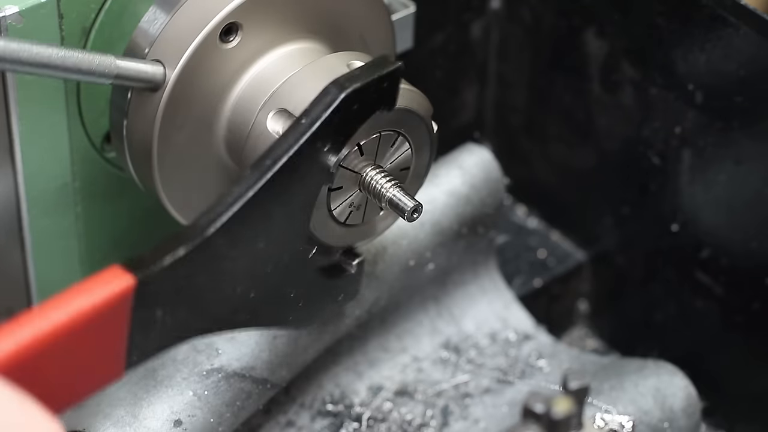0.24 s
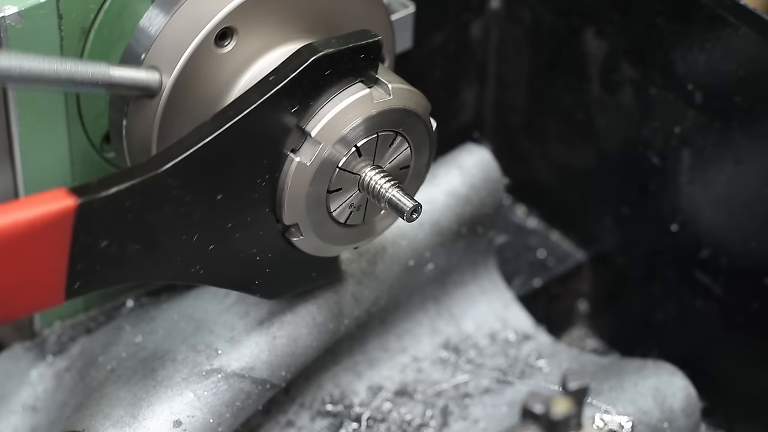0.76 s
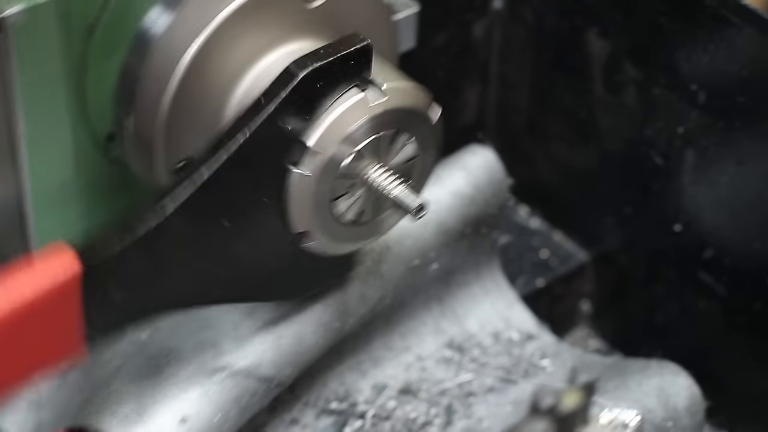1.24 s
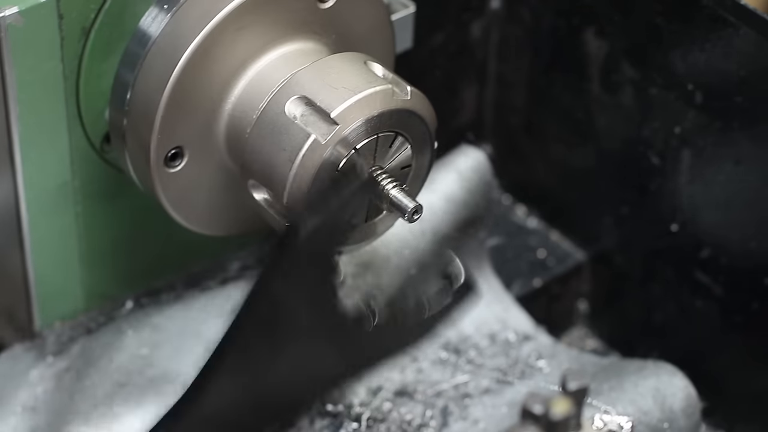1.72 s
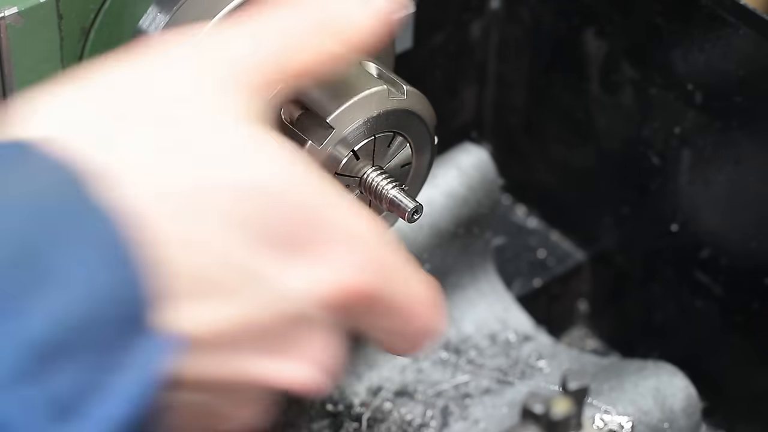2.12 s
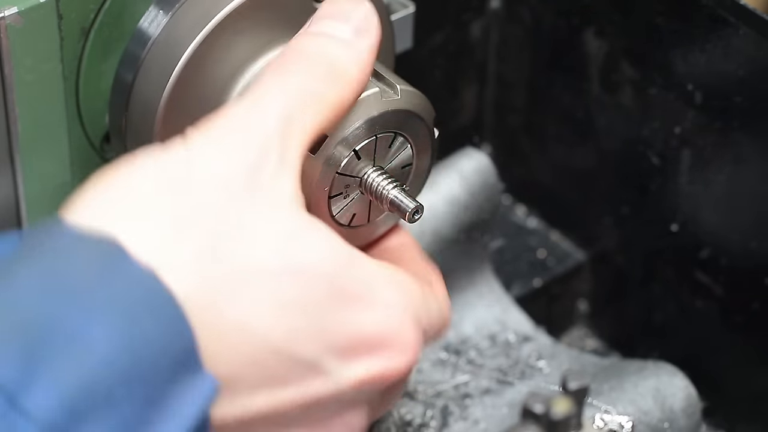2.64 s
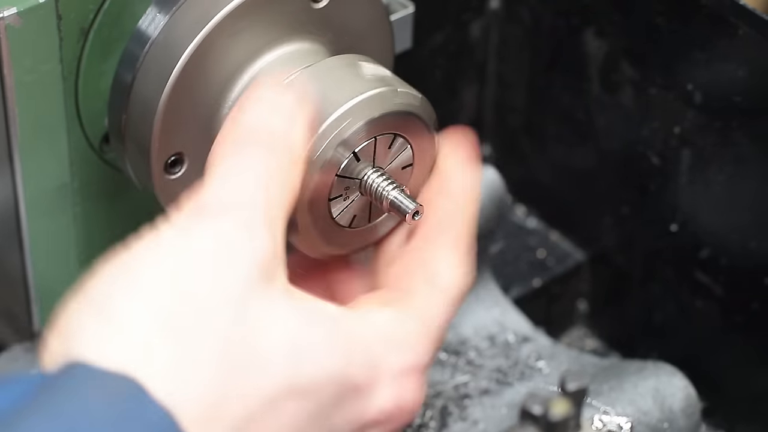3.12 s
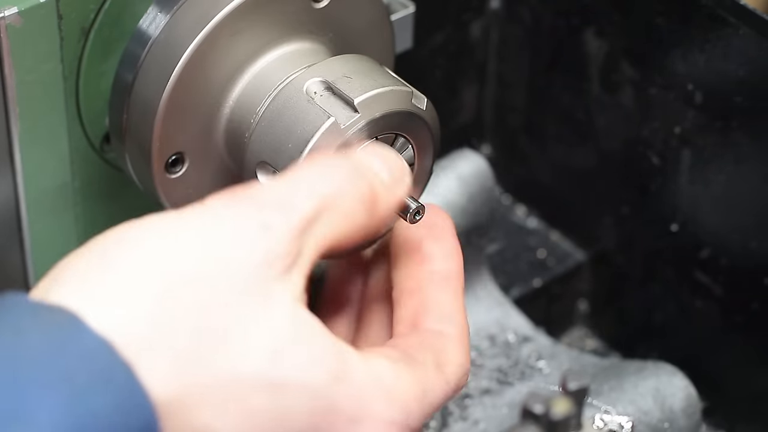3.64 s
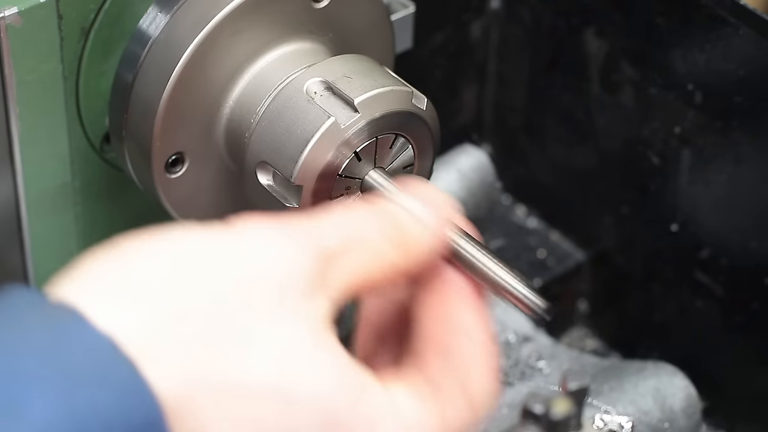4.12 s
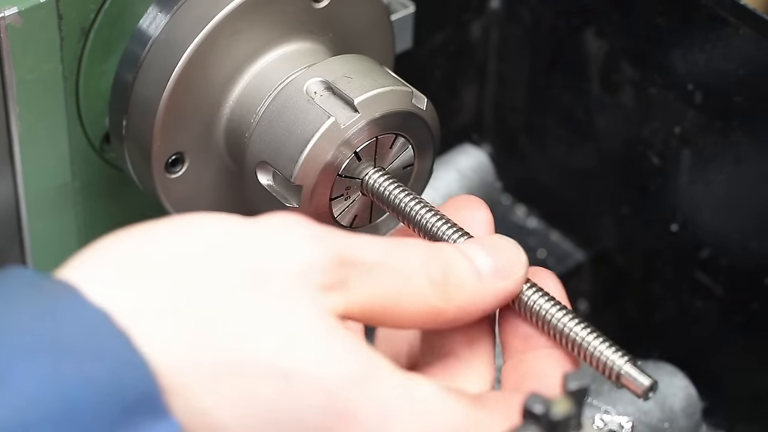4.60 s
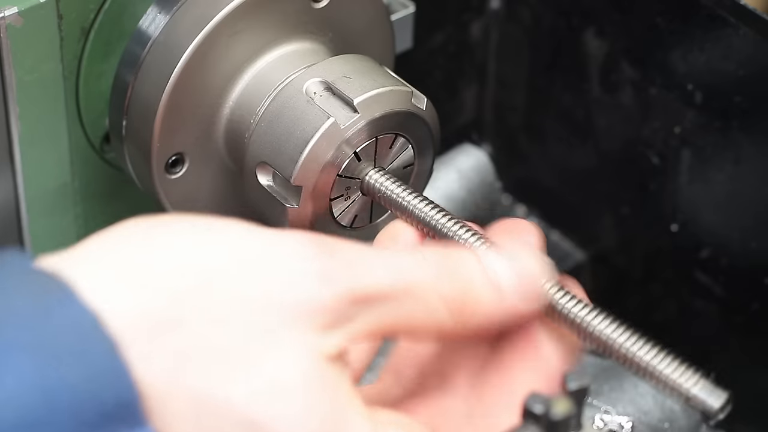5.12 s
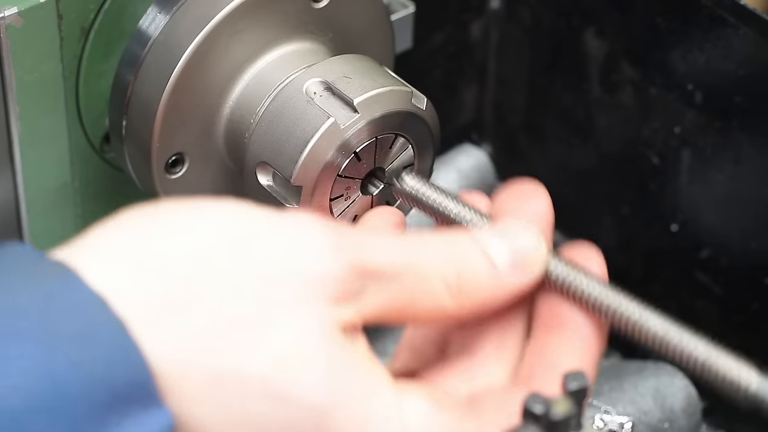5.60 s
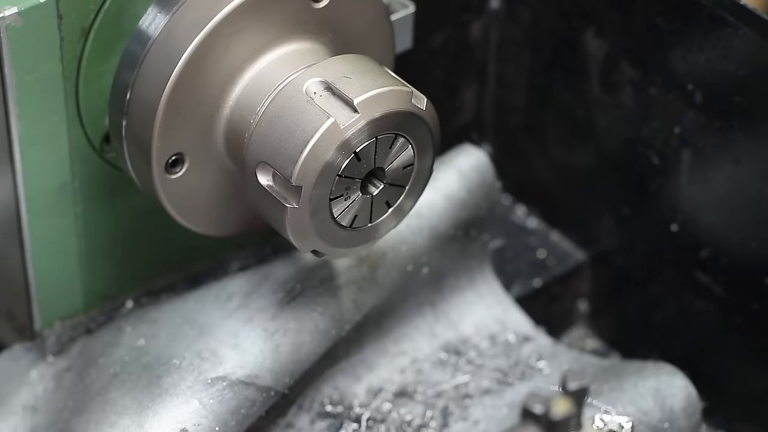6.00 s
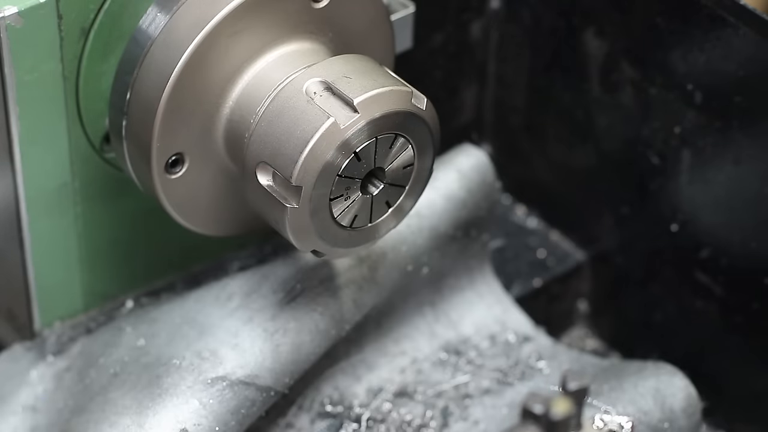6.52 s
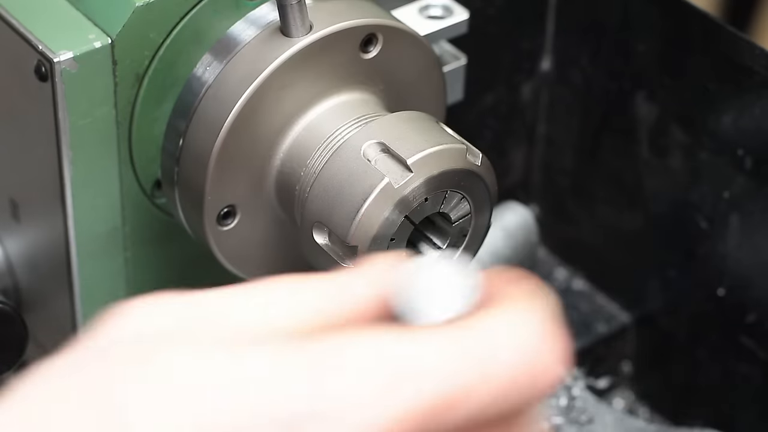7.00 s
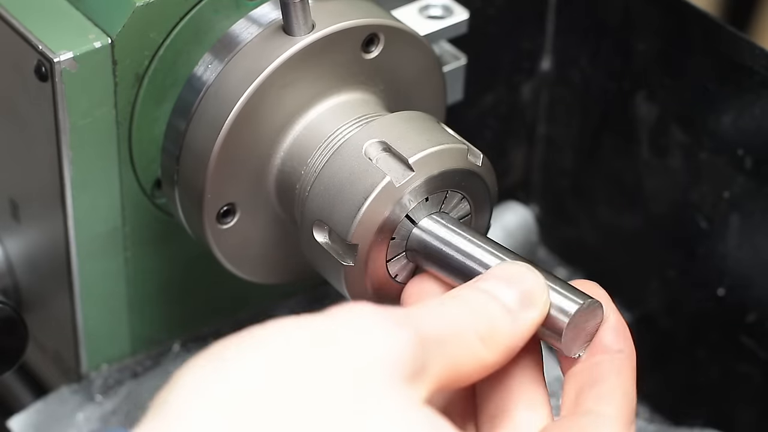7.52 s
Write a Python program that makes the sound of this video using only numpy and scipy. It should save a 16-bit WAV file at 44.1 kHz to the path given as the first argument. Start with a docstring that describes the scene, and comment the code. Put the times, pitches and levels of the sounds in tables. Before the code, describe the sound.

Sharp ringing wrench knocks on a lathe chuck, followed by quieter scraping and ticking as a steel rod is pulled out and another inserted.

```python
"""A hook wrench knocks on the steel nut of a collet chuck and grinds it loose; each blow rings wrench,
nut, spindle head and lathe bed. Fingers unscrew the nut, a threaded rod rasps out through the collet
in jerks and a plain bar slides in. Contacts ring damped steel modes; friction drives them with noise.
Late on, a sleeve rustles over the faint workshop hum."""
import sys
import numpy as np
from scipy import signal
from scipy.fft import rfft, irfft, next_fast_len
from scipy.io import wavfile
from scipy.ndimage import map_coordinates

SR = 44100
rng = np.random.default_rng(int(sys.argv[2]) if len(sys.argv) > 2 else 0)


def generate_wav(signal):
    """Clip the signal to [-1, 1] and save it as 16-bit WAV at the path in sys.argv[1]."""
    frames = np.transpose(np.atleast_2d(signal))
    scaled = np.clip(frames, -1, 1) * 32767
    pcm = np.round(scaled).astype(np.int16)
    wavfile.write(sys.argv[1], SR, pcm)


N = 341807


def amp(db):
    return 10 ** (np.asarray(db) / 20)


def unit_rms(x):
    return x / np.sqrt(np.mean(x ** 2) + 1e-20)


def log_interp(points, hz):
    """Interpolate (Hz, value) points on a log frequency axis."""
    knots_hz, values = np.transpose(points)
    return np.interp(np.log(hz + 1), np.log(knots_hz + 1), values)


def wobble(rate_hz):
    """Smooth random curve, rate_hz knots a second."""
    knots = rng.standard_normal(int(N * rate_hz / SR) + 4)
    return map_coordinates(knots, [np.arange(N) * rate_hz / SR])


def filtered(x, response):
    """Apply a gain given as a function of Hz."""
    size = next_fast_len(len(x) + 8192)
    return irfft(rfft(x, size) * response(np.fft.rfftfreq(size, 1 / SR)), size)[:len(x)]


def lowpass(x, edge_hz):
    return filtered(x, lambda hz: 1 / (1 + (hz / edge_hz) ** 6))


def noise(spectrum, grain_db=0, count=N):
    """Unit-rms noise shaped by (Hz, dB) points; grain_db makes single grains stand out."""
    grains = rng.standard_normal(count) * amp(grain_db * rng.standard_normal(count))
    return unit_rms(filtered(grains, lambda hz: amp(log_interp(spectrum, hz))))


def strokes_db(rows, attack_db_s, release_db_s):
    """Level of each stroke: rise, ramp from start to end level, fall."""
    start_s, length_s, start_db, end_db = np.transpose(rows)[:4, :, None]
    t = np.arange(N) / SR - start_s
    held_db = start_db + (end_db - start_db) * np.clip(t / length_s, 0, 1)
    return held_db - attack_db_s * np.clip(-t, 0, None) - release_db_s * np.clip(t - length_s, 0, None)


def envelope(rows, attack_db_s, release_db_s, offset=False):
    """Summed gain of the strokes; offset adds each row's fifth column in dB."""
    offset_db = np.array(rows)[:, 4:] if offset else 0
    return amp(strokes_db(rows, attack_db_s, release_db_s) + offset_db).sum(axis=0)


def ring(modes, scatter_db, t60_scale, contact_s):
    """Damped modes of unit energy, struck by a contact that rattles briefly."""
    t = np.arange(SR // 2) / SR
    hz, db, t60_s = np.transpose(modes)[..., None]
    db = db + scatter_db * rng.standard_normal(db.shape)
    hz = hz * (1 + .002 * rng.standard_normal(db.shape))  # slightly different random pitch each hit
    rise = 1 - np.exp(-t * hz / 2)
    sound = np.sum(amp(db - 60 * t / (t60_s * t60_scale)) * rise * np.sin(2 * np.pi * hz * t), axis=0)
    if contact_s:
        rattle = rng.standard_normal(len(t)) * amp(-60 * t / contact_s)
        sound = signal.fftconvolve(sound, rattle)[:len(t)]
    return sound / np.linalg.norm(sound)


def rubbed(gain, modes, shift_db, rate_hz, t60_scale=1):
    """Friction noise drives each mode with a strength that shifts as the contact moves."""
    force = gain * rng.standard_normal(N)
    out, energy = np.zeros(N), 0
    for hz, db, t60_s in modes:
        pole, step_rad = amp(-60 / (t60_scale * t60_s * SR)), 2 * np.pi * hz / SR
        drive = amp(db + shift_db * wobble(rate_hz)) * force
        out += signal.lfilter([np.sin(step_rad)], [1, -2 * pole * np.cos(step_rad), pole ** 2], drive)
        energy += amp(2 * db) / 2 / (1 - pole ** 2)
    return out / np.sqrt(energy)


# Still workshop air. Each row: frequency in Hz, relative level in dB.
AIR_SPECTRUM = [(26, -30.5), (45, -6.5), (70, -6.5), (111, -3), (157, -20), (190, -13), (249, -22.5),
                (311, -23.5), (786, -30), (1520, -28.5), (3410, -36), (6930, -38), (15500, -43)]

def room_tone():
    """Steady air noise and a wavering hum near 99 Hz."""
    hum_db = -63.5 + 3.5 * wobble(11)
    hum_hz = 99 + 3 * wobble(5.7)
    return amp(hum_db) * np.sin(2 * np.pi * np.cumsum(hum_hz) / SR) + amp(-63.5) * noise(AIR_SPECTRUM)


# Soft noise swells. Each row: start and length in seconds, start and end level in dB.
SOFT_SWELLS = [(0, 0.011, -42, -54.5), (.29, 0.025, -67, -53.5), (1.27, 0.087, -53, -49.5),
               (4.27, 0.11, -52, -73), (5.87, 0.21, -64, -58), (6.72, 0.2, -70.5, -62)]
# Their spectrum. Each row: frequency in Hz, relative level in dB.
SWELL_SPECTRUM = [(150, -35.5), (250, -2.5), (478, -4.5), (1130, -5.5), (1280, -9.5), (2340, -3),
                  (5510, -19), (12000, -37.5), (15600, -65.5), (22000, -120)]

def soft_swells():
    """Grainy noise swells from a faint floor: tails of the wrench blows early, sleeve rustle later."""
    gain = envelope(SOFT_SWELLS, attack_db_s=390, release_db_s=47) + amp(-74.5)
    return gain * amp(-1.5 + 1.7 * wobble(33)) * noise(SWELL_SPECTRUM, grain_db=2.8)


# Steel contact noise. Each row: frequency in Hz, relative level in dB.
CONTACT_SPECTRUM = [(88, -41), (150, -10.5), (412, -3), (1290, -6.5), (2550, 0.5), (3690, -9), (4310, -5.5),
                    (6120, -9), (6740, -22.5), (8180, -21.5), (15500, -39.5)]

def contact_burst(low_t60_s, high_t60_s, treble_db, rise_s):
    """Broadband part of a contact; the treble dies first."""
    t = np.arange(SR // 2) / SR
    low = lowpass(noise(CONTACT_SPECTRUM, count=len(t)), 5500)
    high = noise([(3500, -37.5), (6500, 2), (9000, -2), (12500, -9), (15000, -8)], count=len(t))
    rise = 1 - np.exp(-t / rise_s)
    return rise * (low * amp(-60 * t / low_t60_s) + high * amp(treble_db - 60 * t / high_t60_s))


# Wrench blows. Each row: start in seconds, level in dB, trims in dB for wrench ring, spindle head,
# treble and nut, decay scale.
WRENCH_BLOWS = [(0.0014, -37, -20.5, 3.5, -31.5, -1, .6), (0.0806, -4.5, -8.5, -34.5, -7.5, -24, .4),
                (0.0863, -2, 2, -38, -9, -25, 0.6), (0.0974, -2, -2.5, -31, -28, -21.5, .62),
                (0.2381, -17, 3, -37, -16.5, -25, .6), (0.2489, -7, -1.5, -40.5, -26.5, -24, 0.62),
                (0.2575, -6.5, -9.5, -21, -13, -21.5, 0.45), (0.287, -11, -10.5, -10, -24, -5.5, 0.34),
                (0.323, -20, -13.5, -12.5, -28.5, -8, 0.76), (0.373, -21, -8.5, -10.5, -24, -7.5, 0.82),
                (0.388, -23.5, -6, -27, -20, -10.5, .4), (0.3934, -11, -4.5, -18, -24.5, 1, 0.33),
                (0.397, -2.5, -12, -14.5, -37, -7, 0.4), (0.476, -25, -6.5, -23.5, -18.5, -2.5, 0.44),
                (0.4795, -3, -11.5, -24, -23.5, -10, 0.5), (0.6495, -47, -19, -28, -5.5, -17.5, .6),
                (0.8268, -30.5, -25.5, -19, -12, -11.5, 0.31), (0.844, -42.5, -23, 4.5, -16, -2.5, .6),
                (1.1238, -5.5, -20, -16, -21, -11, .5), (1.1299, 8.5, -31.5, -21.5, -25.5, -10.5, 1.7),
                (1.1935, -7.5, -22, -30, -24.5, -10, .3), (1.2395, -7.5, -20.5, -16.5, -22.5, -10, .4),
                (1.2974, -19.5, -36, -38, -30, -28, .6), (1.3845, -31.5, -11.5, 2, -42, 2, .4),
                (1.4801, -17.5, -22, -5, -22.5, -6, 0.26), (1.6378, -40.5, -14, 3, -11, 1.5, 0.69),
                (1.652, -45, -5, 7, -5.5, -13, 0.79)]
# Modes of the wrench, its beating pair, the spindle head and the tight nut.
# Each row: frequency in Hz, relative level in dB, t60 in seconds.
WRENCH_MODES = [(2485, -12, .12), (3930, -28, 0.17), (4337, -13, 0.19), (5560, -22.5, 0.11),
                (6160, -22.5, 0.11), (8170, -15, 0.044), (8590, -20.5, 0.046), (8890, -28, 0.1293),
                (11040, -22, 0.023), (14490, -36.5, .05)]
BEATING_MODES = [(2688.7, 1.5, 0.125), (2727, 2, 0.1)]
HEAD_MODES = [(246, -16, 0.14), (334.8, -11, 0.038), (380, 1, 0.11), (419.9, 5.5, 0.15), (430.9, -5, 0.21),
              (532.7, 7.5, 0.12), (580, -9.5, 0.1), (630, -2, 0.18), (718.5, -3.5, 0.13), (898, -3, 0.039)]
TIGHT_NUT_MODES = [(1060, 2, 0.23), (1366, -3, 0.063), (1446, -3, 0.21), (1650, -1.5, 0.11),
                   (1762, 1.5, .12), (2119.5, -6, 0.017), (2370, 3.5, 0.14), (2916, -4.5, 0.092),
                   (3070, -10.5, 0.062), (4600, -8.5, 0.065)]

def wrench_blows():
    """Each blow rings wrench, spindle head and nut over a noise burst."""
    out = np.zeros(N + SR)
    for start_s, db, ring_db, head_db, treble_db, nut_db, decay in WRENCH_BLOWS:
        gripped = min(decay, .7)  # the grip always damps the wrench
        hit = amp(ring_db + 25.5) * ring(BEATING_MODES, .95, gripped, contact_s=0)
        hit += amp(ring_db + 10.5) * ring(WRENCH_MODES[:3], 2.2, gripped, contact_s=.0055)
        hit += amp(treble_db + 18.5) * ring(WRENCH_MODES[3:], 3.2, gripped, contact_s=.012)
        hit += amp(head_db + 24.5) * ring(HEAD_MODES, 2.4, 1, contact_s=.012)
        hit += amp(nut_db + 16) * ring(TIGHT_NUT_MODES, 4.4, .4, contact_s=.022)
        hit += amp(-14.5) * contact_burst(.06, .029 * decay, treble_db + 12.5, rise_s=.00094)
        out[round(start_s * SR):][:len(hit)] += amp(db) * hit
    return out[:N]


# Lathe bed modes. Each row: frequency in Hz, relative level in dB, t60 in seconds.
BED_MODES = [(188, -6, 1.7), (240, -10.5, 3.2), (355, 2.5, 2.4), (413, 1, .63), (657, -3.5, 1.1)]

def lathe_bed():
    """The cast bed hums on faintly after each blow."""
    impulses, t = np.zeros(N), np.arange(N) / SR
    for start_s, db, *_ in WRENCH_BLOWS:
        impulses[round(start_s * SR)] = amp(db - 51)
    hum = sum(amp(db - 60 * t / t60_s) * np.sin(2 * np.pi * hz * t) for hz, db, t60_s in BED_MODES)
    return signal.fftconvolve(impulses, hum)[:N]


# Low thumps. Each row: start in seconds, frequency in Hz, level in dB.
LOW_THUMPS = [(0.083, 137, -26.5), (1.13, 72.6, -36.5), (1.191, 45, -45)]

def low_thumps():
    """Short low thumps under the hardest blows: sines that die in a few cycles."""
    out, t = np.zeros(N), np.arange(N) / SR
    for start_s, hz, db in LOW_THUMPS:
        cycles = np.clip(hz * (t - start_s), 0, None)
        out += amp(db) * np.sin(2 * np.pi * cycles) * np.exp(-cycles / 1.3)
    return out


# Wrench shoves. Each row: start and length in seconds, start and end level in dB, scuff offset in dB.
HOOK_SHOVES = [(.55, 0.26, -51, -56, -12), (.828, 0.0043, -53.5, -50.5, 8), (.86, 0.012, -47.5, -61, -29.5),
               (1.1, 0.013, -59, -44, 5), (1.26, 0.056, -38.5, -49.5, -8), (1.345, 0.081, -55, -73, 7.5),
               (1.4, 0.016, -33, -36, -26.5), (1.486, 0.012, -39.5, -30, -10),
               (1.664, 0.011, -30.5, -34.5, -15.5), (1.72, 0.21, -48, -56, -12), (1.92, 0.5, -58, -63, 4.5)]

def hook_grind():
    """The hook grinds and scuffs in the nut's slots; the head rings over a low groan."""
    push = envelope(HOOK_SHOVES, attack_db_s=380, release_db_s=340) * amp(2.2 * wobble(27))
    scuff = envelope(HOOK_SHOVES, attack_db_s=380, release_db_s=340, offset=True)
    scuff *= noise([(800, -13), (2400, 5), (5000, -11), (9000, -17), (15000, -20.5)], grain_db=3)
    groan = noise([(60, -29.5), (100, -3.5), (170, 5), (300, .5), (1000, -18.5), (4000, -42.5)], 6)
    head = rubbed(push, HEAD_MODES, shift_db=.96, rate_hz=98)
    return amp(-13.5) * head + amp(-8) * push * groan + amp(-9.5) * scuff


# Palm slips. Each row: start and length in seconds, start and end level in dB.
PALM_SLIPS = [(.6, 0.15, -69.5, -65), (.995, 0.032, -74, -67)]

def palm():
    """Thin hiss of the palm shifting on the wrench handle."""
    gain = envelope(PALM_SLIPS, attack_db_s=380, release_db_s=500) * amp(2.5 * wobble(40))
    return gain * noise([(2000, -28.5), (6000, -3), (11000, .5), (15500, -3.5)], grain_db=3)


# Spindle shudders. Each row: start and length in seconds, start and end level in dB.
SHUDDERS = [(1.14, 0.25, -51, -43), (1.5, 0.024, -36, -40), (1.62, 0.11, -55, -46.5), (1.9, 0.19, -65, -53),
            (2.39, .012, -54, -52), (2.87, .012, -50, -54.5), (3.21, .012, -44, -50.5),
            (3.37, 0.34, -63, -62)]

def spindle_rumble():
    """Low noise swells from a faint floor when the spindle is strained."""
    strain = envelope(SHUDDERS, attack_db_s=380, release_db_s=120) + amp(-78.5)
    return amp(-5) * strain * noise([(18, -30), (25, -2), (31, 0), (45, -16.5), (100, -21), (300, -73)])


# Rod and collet squeaks. Each row: start in seconds, frequency in Hz, level in dB, t60 in seconds.
STEEL_SQUEAKS = [(2.135, 7500, -56.5, 0.2), (2.271, 2510, -41, 0.036), (2.359, 1774, -53, .12),
                 (3.383, 1780, -50, 0.07), (3.85, 8266, -40, .05), (3.882, 4900, -41, 0.058),
                 (3.922, 4940, -35, 0.052), (3.923, 9340, -34.5, 0.031), (4.385, 9200, -26, 0.11),
                 (4.445, 2330, -36.5, 0.22), (4.698, 1744, -50.5, 0.19), (4.722, 1724, -38, 0.07),
                 (4.866, 1775, -51, 0.081), (4.873, 1545, -42, 0.084), (5.05, 3600, -50, 0.16),
                 (5.148, 5450, -45, 0.043), (5.27, 4480, -47, .04), (7.322, 4600, -58, .04),
                 (7.378, 4600, -50, 0.03), (7.652, 1770, -50, 0.059)]

def squeaks():
    """One roughly driven mode swells and dies."""
    out, t = np.zeros(N + SR), np.arange(SR // 2) / SR
    for start_s, hz, db, t60_s in STEEL_SQUEAKS:
        rise_s = .038 * t60_s
        drift_rad = np.cumsum(rng.normal(0, .11, len(t)))
        swell = np.where(t < rise_s, t / rise_s, amp(-60 * (t - rise_s) / t60_s))
        out[round(start_s * SR):][:len(t)] += amp(db) * swell * np.sin(2 * np.pi * hz * t + drift_rad)
    return out[:N]


# Finger pushes. Each row: start and length in seconds, start and end level in dB, skin offset in dB.
NUT_TURNS = [(2.142, 0.011, -74, -76.5, 9), (2.288, 0.025, -54, -68, -25),
             (2.348, 0.18, -64.5, -56.5, -5.5), (2.55, 0.042, -52, -49, -4),
             (2.641, 0.36, -61.5, -60, -9.5), (2.944, 0.07, -44.5, -61, -7), (3.038, 0.093, -61, -54, -8.5),
             (3.3, .01, -64.5, -69.5, 3), (3.38, 0.022, -54, -58.5, -10), (3.557, 0.037, -51.5, -53, -7.5),
             (3.695, 0.0092, -47, -55, -6.5)]
# Loose nut modes. Each row: frequency in Hz, relative level in dB, t60 in seconds.
LOOSE_NUT_MODES = [(1170, -1.5, 0.022), (1784, -8, 0.022), (2346, 5.5, 0.01), (2770, -12.5, 0.026)]
# Skin on steel. Each row: frequency in Hz, relative level in dB.
SKIN_SPECTRUM = [(410, -57), (700, -34), (1250, 1.5), (1540, -6), (2310, -10.5), (5950, -15.5),
                 (7810, -14.5), (15500, -22)]

def nut_turns():
    """The thread rubs in the loose nut while fingers slip over its flanks."""
    thread_db = strokes_db(NUT_TURNS, attack_db_s=1250, release_db_s=340)
    top_db = thread_db.max(axis=1, keepdims=True)
    skin_db = top_db + np.array(NUT_TURNS)[:, 4:] + 1.33 * (thread_db - top_db)  # slip swings wider
    skin = amp(skin_db).sum(axis=0) * noise(SKIN_SPECTRUM, grain_db=4)
    rub = amp(thread_db).sum(axis=0) * amp(4.4 * wobble(31))
    return amp(-4) * rubbed(rub, LOOSE_NUT_MODES, shift_db=2, rate_hz=9.5) + amp(3.5) * skin


# Nut, rod and bar touching the collet. Each row: start in seconds, level in dB, head and treble
# trims in dB.
COLLET_TICKS = [(2.2711, -34.5, -10, -29), (2.7164, -35.5, -22, -18), (3.1203, -38.5, -24, -9),
                (3.693, -26, -14.5, -3), (3.7869, -26, -28, -11), (3.811, -46, -24, -6),
                (3.923, -30, -6.5, -20), (4.055, -38.5, -6, -18), (4.0848, -32.5, -5.5, 4),
                (4.104, -41, -28, -1), (4.129, -39, -20, 3), (4.19, -33, -34, -9),
                (4.2373, -38.5, 3.5, -18.5), (4.2506, -25.5, -11, -12), (4.3558, -34, -5, -9),
                (4.371, -21.5, -14, -7), (4.3892, -19, -16, -3.5), (4.4, -35.5, -25, 17),
                (4.4186, -24.5, -3, -5), (4.5522, -26, -10.5, -5.5), (4.721, -32, -40, -23),
                (4.84, -39, -17, 5), (4.854, -49, -16, 0), (4.8665, -33, -14, 4.5), (5.022, -35, -9, 4.5),
                (5.036, -37, -10, 8), (5.0482, -46.5, -18, 24.5), (5.1507, -28.5, -18, -5.5),
                (5.1815, -24.5, -19, 0), (5.2686, -28, -14, 0), (7.1651, -12, -38, -6),
                (7.1972, -21.5, -22, -16), (7.2215, -22, -9, -4), (7.2571, -23.5, -29, -8.5),
                (7.262, -30, -20, -12), (7.3216, -31, -27, -12), (7.3351, -30, -30, -13),
                (7.345, -23.5, -12, -12), (7.638, -33.5, -26, -7)]
# Modes of the rod with the collet, and of the plain bar.
# Each row: frequency in Hz, relative level in dB, t60 in seconds.
ROD_MODES = [(1840, -1.5, 0.022), (2560, -3.5, 0.047), (3030, -1.5, 0.025), (3536, -10.5, 0.051),
             (4880, 0, 0.022), (5560, -6, 0.029), (5970, -4.5, 0.027), (6400, -5.5, 0.049),
             (7640, -3, 0.037), (8310, 5, 0.02), (9430, 4.5, 0.019), (10450, 8.5, 0.0076),
             (11150, -4, 0.01), (14760, -7, 0.025)]
BAR_MODES = [(1798, 6, 0.054), (2280, 2, 0.025), (2840, 1, 0.042), (3660, -1, 0.037), (4520, -9, 0.03),
             (5930, 0, 0.016), (7760, 7, 0.018), (11300, -3, 0.013), (14000, -4, .006)]
BAR_IN_S = 7

def collet_ticks():
    """Small steel contacts; each lands at another spot, so mode strengths vary."""
    out = np.zeros(N + SR)
    for start_s, db, head_db, treble_db in COLLET_TICKS:
        if start_s < BAR_IN_S:
            stock = ring(ROD_MODES, 2.7, .49, contact_s=.01)
        else:
            stock = ring(BAR_MODES, 2.8, .77, contact_s=.0075)
        hit = amp(treble_db + 9.5) * stock
        hit += amp(head_db + 24.5) * ring(HEAD_MODES, 4.9, .99, contact_s=.051)
        hit += amp(-14.5) * contact_burst(.064, .018, treble_db + 5, rise_s=.0011)
        out[round(start_s * SR):][:len(hit)] += amp(db) * hit
    return out[:N]


# Rod jerks. Each row: start and length in seconds, start and end level in dB, head offset in dB.
ROD_JERKS = [(3.782, 0.019, -42, -37, -7), (3.808, 0.088, -30.5, -35.5, -1),
             (3.924, 0.0043, -50, -44.5, -3), (4.092, 0.081, -38.5, -26, 3.5),
             (4.252, 0.041, -32.5, -71, -15), (4.322, 0.0091, -47, -73, 2), (4.356, 0.041, -42, -26.5, -6),
             (4.415, 0.12, -36.5, -43, 3.5), (4.697, 0.021, -65, -44, 8.5), (4.838, 0.026, -43, -38, 0.5),
             (5.008, 0.036, -53, -34.5, 1.5), (5.504, 0.014, -54.5, -52.5, 0.5)]
# Thread scraping the jaws. Each row: frequency in Hz, relative level in dB.
GRIT_SPECTRUM = [(530, -31.5), (900, 2.5), (1450, -7.5), (1800, -8), (2540, -0.5), (4390, -10), (8980, -10),
                 (10100, -1.5), (12100, -26.5), (15500, -16.5)]
CREST_RATE_HZ, CREST_DECAY_DB, CREST_SCATTER_DB = 99.3, 18, 2.5

def rod_drag():
    """The thread rasps over the jaws and shakes rod and head; its crests click in the treble."""
    scrape = envelope(ROD_JERKS, attack_db_s=1850, release_db_s=585)
    shake = envelope(ROD_JERKS, attack_db_s=1850, release_db_s=380, offset=True)
    crests = np.cumsum(CREST_RATE_HZ * np.exp(.24 * wobble(25))) / SR
    size_db = CREST_SCATTER_DB * rng.standard_normal(N // 50)[crests.astype(int)]
    click_db = size_db - CREST_DECAY_DB * (crests % 1) + 7.1 * np.tanh(wobble(300))
    clicks = scrape * unit_rms(amp(click_db))
    rasp = scrape * unit_rms(amp(3.4 * np.tanh(wobble(300))))
    rod = amp(-12.5) * rubbed(rasp, ROD_MODES[:8], shift_db=3.5, rate_hz=28, t60_scale=.6)
    rod += amp(-16) * rubbed(clicks, ROD_MODES[8:], shift_db=4.8, rate_hz=34)
    grit = noise(GRIT_SPECTRUM, grain_db=2.7)
    dull = lowpass(grit, 6000)
    head = rubbed(shake, HEAD_MODES[2:], shift_db=1.8, rate_hz=20, t60_scale=1.15)
    return rod + amp(-10.5) * (rasp * dull + clicks * (grit - dull)) + amp(-11) * head


# Bar pushes. Each row: start and length in seconds, start and end level in dB, head offset in dB.
BAR_PUSHES = [(7.164, 0.066, -49, -39.5, -0.5), (7.322, 0.061, -44.5, -49.5, 3),
              (7.478, 0.0094, -58.5, -63, 9.5), (7.642, 0.016, -54.5, -56, 8.5)]
BORE_T60_SCALE = .33

def bar_slide():
    """A dull rub sounds through bar, nut and head; the bar in the bore damps the last two."""
    rub = envelope(BAR_PUSHES, attack_db_s=2340, release_db_s=230) * unit_rms(amp(1.4 * wobble(150)))
    shake = envelope(BAR_PUSHES, attack_db_s=2340, release_db_s=170, offset=True)
    head = rubbed(shake, HEAD_MODES, shift_db=3.4, rate_hz=17, t60_scale=BORE_T60_SCALE)
    puff = shake * noise([(120, -32), (250, 0), (600, 5), (1000, -4), (2000, -42)])
    nut = rubbed(rub, TIGHT_NUT_MODES, shift_db=4.8, rate_hz=25, t60_scale=BORE_T60_SCALE)
    bar = rubbed(rub, BAR_MODES, shift_db=2.8, rate_hz=25)
    hiss = rub * noise(CONTACT_SPECTRUM, grain_db=3.5)
    return amp(-9) * nut + amp(-19) * bar + amp(-20) * hiss + amp(-10) * head + amp(-7) * puff


def radiated(x, edge_hz):
    """Steel parts radiate little bass."""
    return filtered(x, lambda hz: 1 / np.sqrt(1 + (edge_hz / (hz + 1)) ** 8))


# Workshop decay. Each row: frequency in Hz, t60 in seconds.
ROOM_T60_S = [(200, 0.56), (2000, 0.16), (6000, 0.15), (14000, 0.018)]

def reverb(x):
    """The workshop's noise tail; highs die first."""
    hz, t, spectra = signal.stft(rng.standard_normal(SR // 2), SR, nperseg=256)
    decay = amp(-60 * t / log_interp(ROOM_T60_S, hz)[:, None])
    tail = signal.istft(spectra * decay, SR, nperseg=256)[1]
    return signal.fftconvolve(np.pad(x, (300, 0)), tail / np.linalg.norm(tail))[:N]


def scene():
    """Work at the chuck with its reverb, over the background; mono."""
    work = radiated(wrench_blows(), edge_hz=250) + lathe_bed() + low_thumps() + hook_grind() + palm()
    work += radiated(squeaks() + nut_turns() + collet_ticks() + rod_drag(), edge_hz=300) + bar_slide()
    background = room_tone() + soft_swells() + spindle_rumble()
    return (work + amp(-14) * reverb(work) + background)[None]


def record(dry):
    """Soft-clip the loudest blows, then band-limit."""
    top_hz = 15790
    clipped = dry[0] / (1 + np.abs(dry[0]) ** 8) ** (1 / 8)
    return filtered(clipped, lambda hz: np.clip((top_hz - hz) / 150 + .5, 0, 1))[None]


dry = scene()
out = record(dry)
generate_wav(out)
```